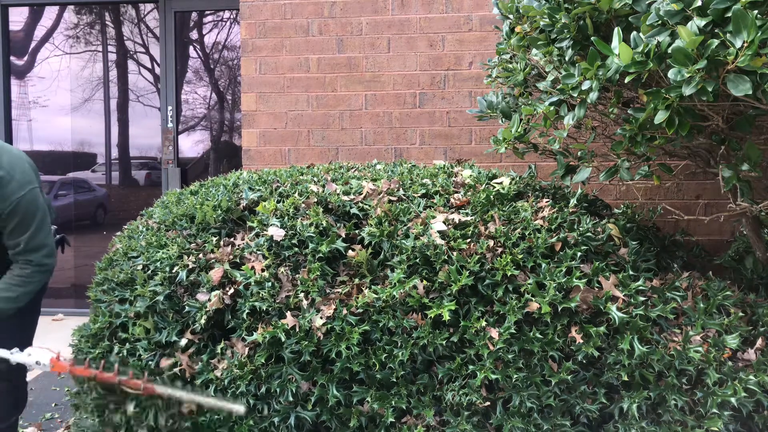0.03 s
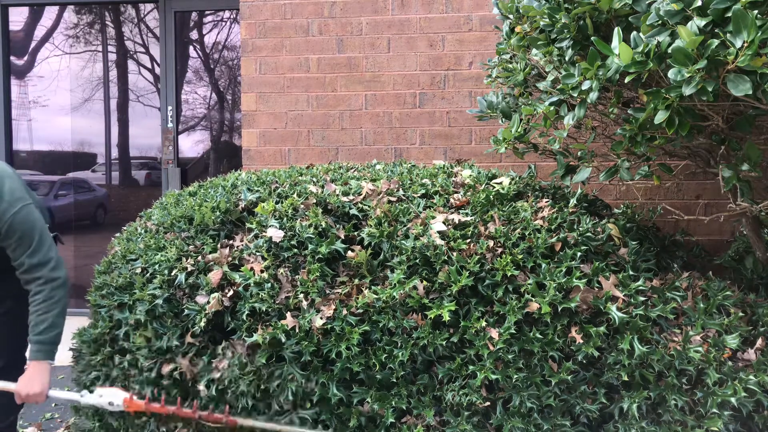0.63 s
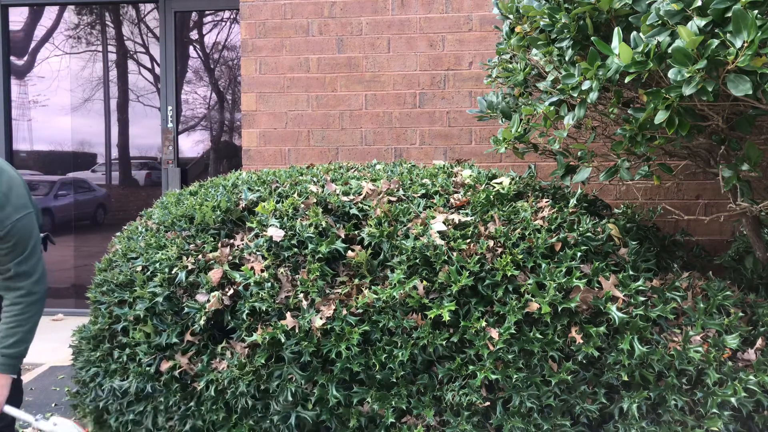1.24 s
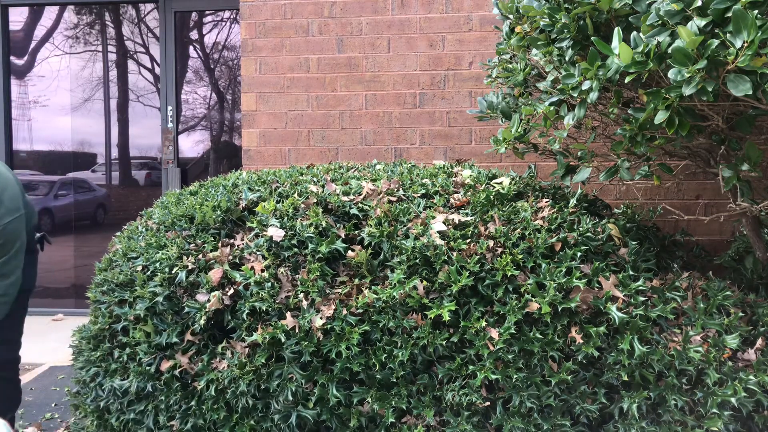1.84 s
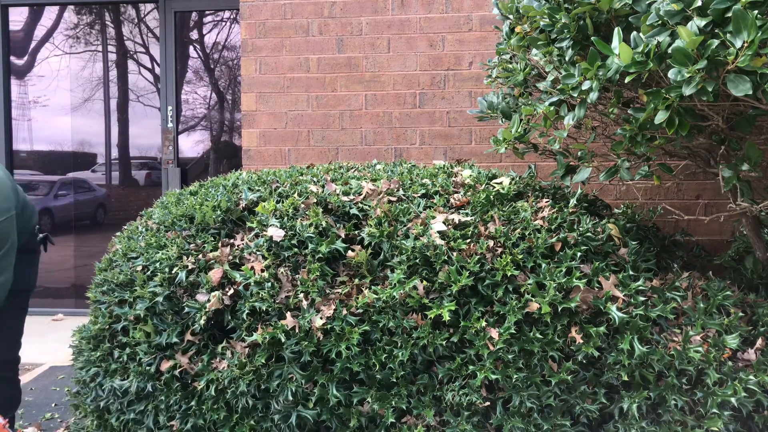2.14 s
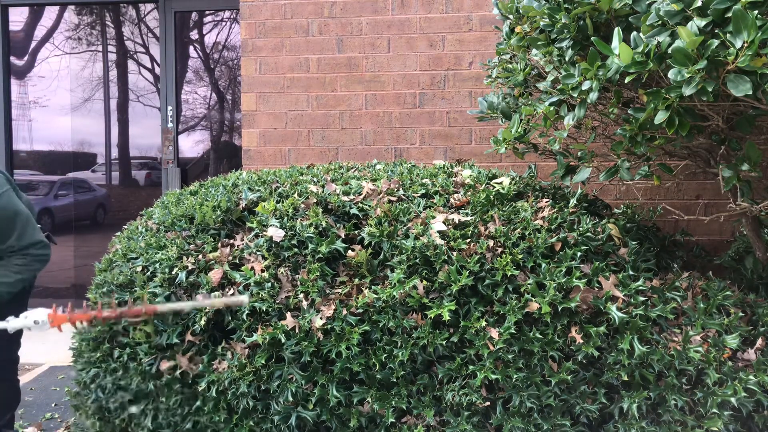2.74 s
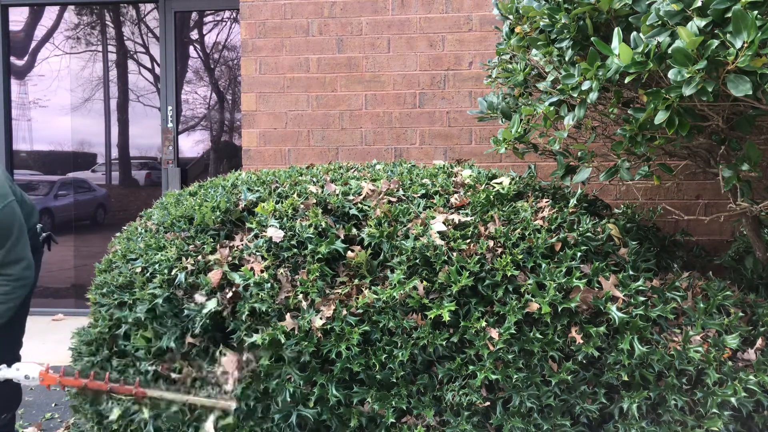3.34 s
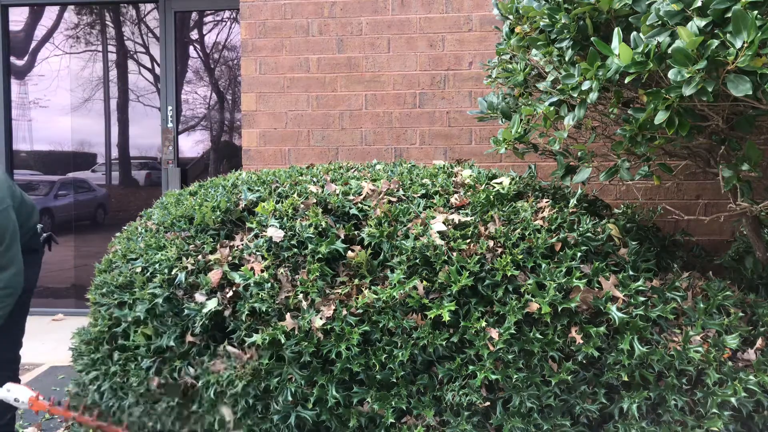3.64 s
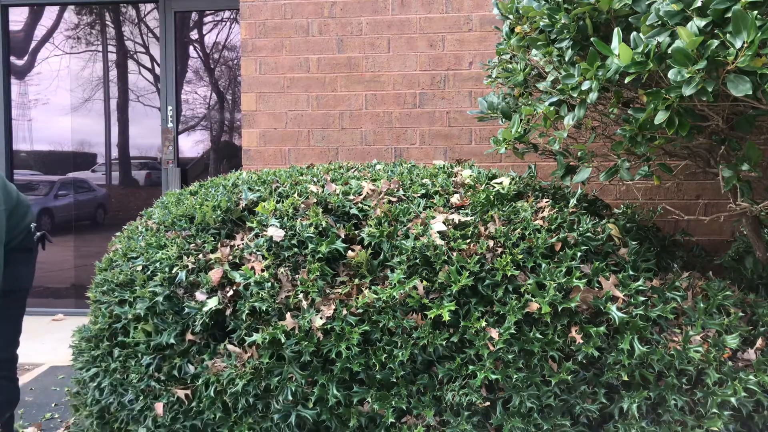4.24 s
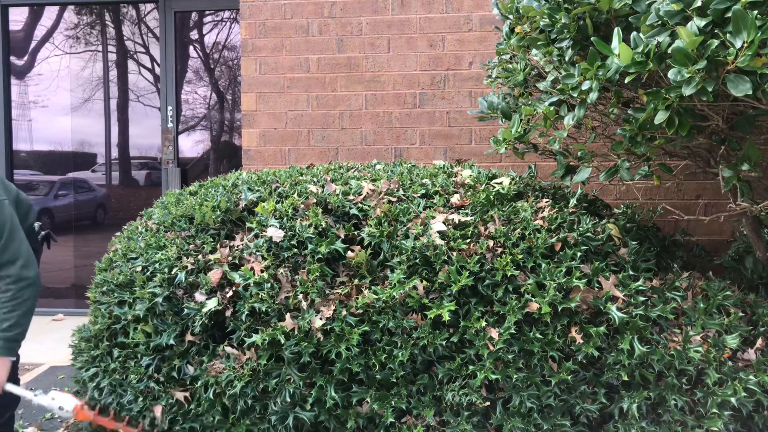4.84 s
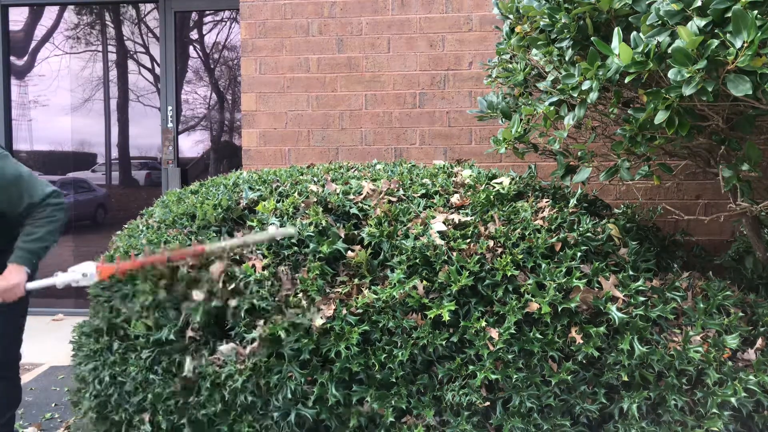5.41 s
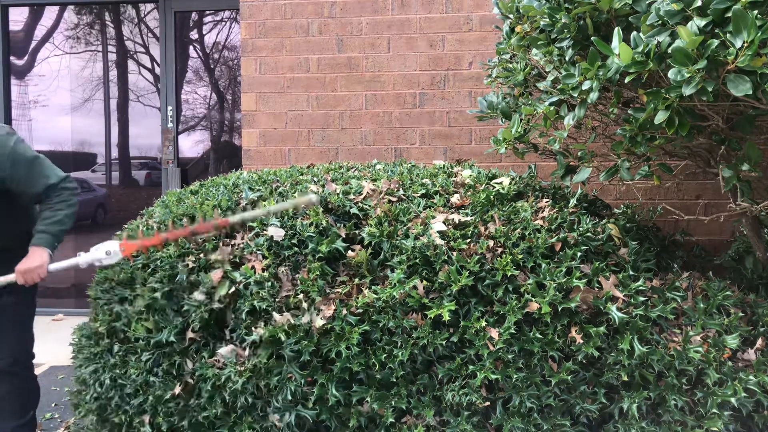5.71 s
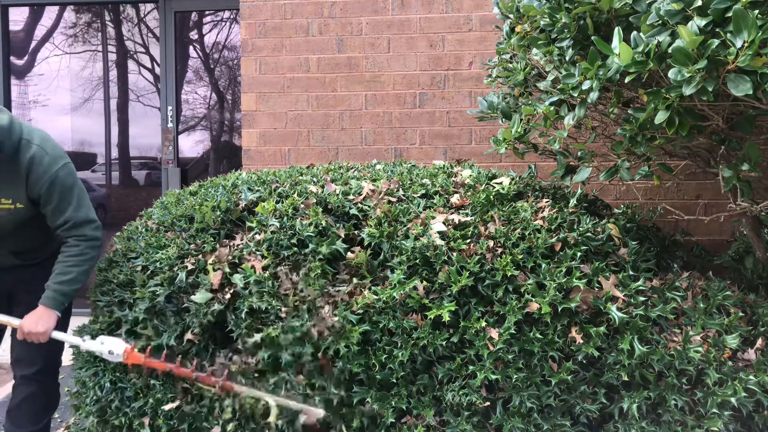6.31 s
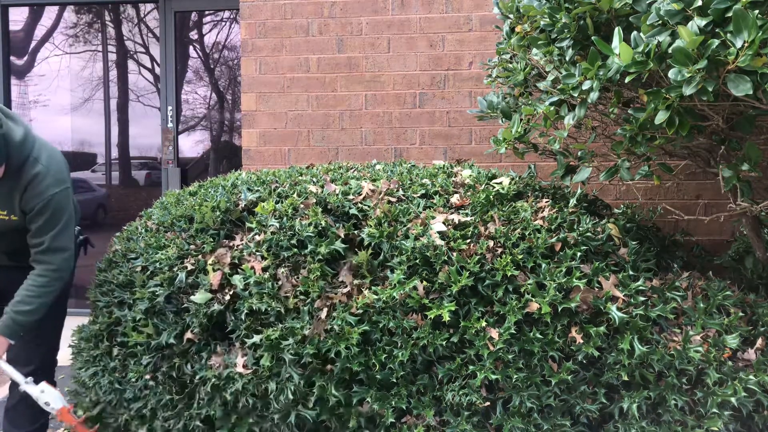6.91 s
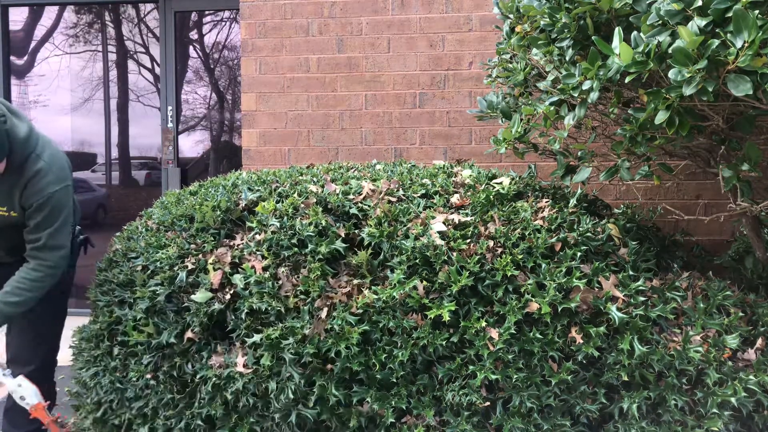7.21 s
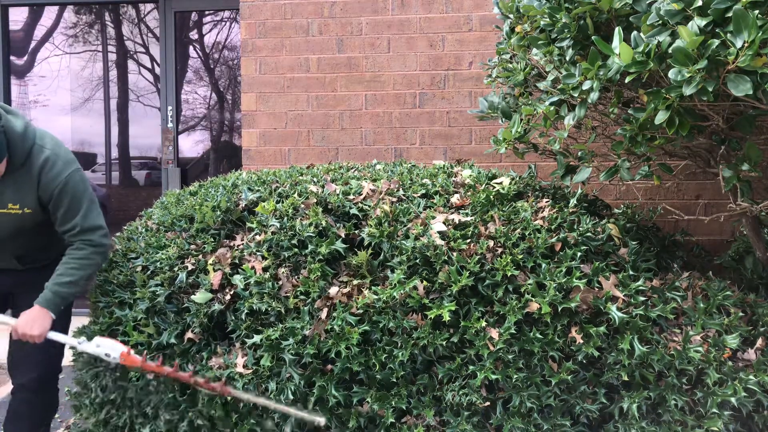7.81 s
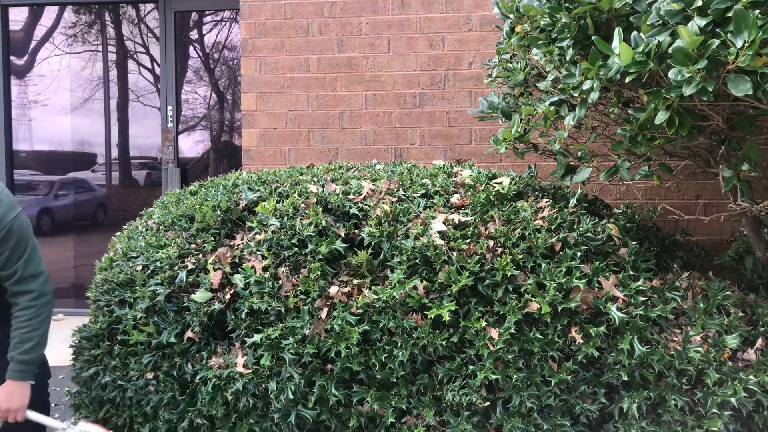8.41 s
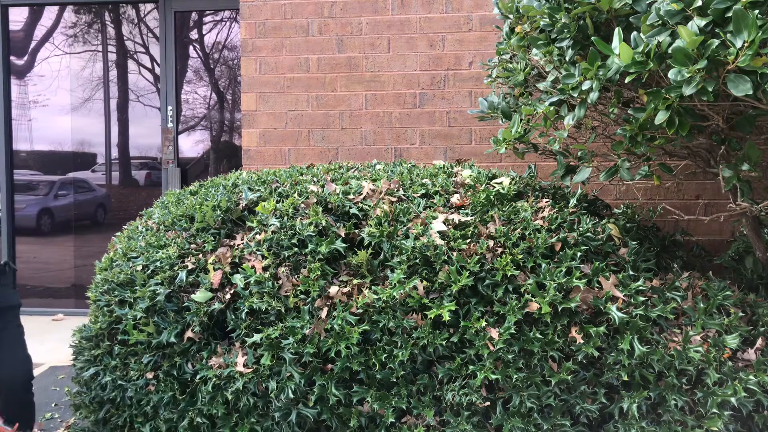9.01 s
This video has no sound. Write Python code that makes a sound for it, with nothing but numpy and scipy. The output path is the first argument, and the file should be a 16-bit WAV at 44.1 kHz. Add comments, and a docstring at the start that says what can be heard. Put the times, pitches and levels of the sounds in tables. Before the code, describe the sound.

Petrol hedge trimmer running flat out, the engine note swelling and fading over rattling blades and small snips of leaves and twigs.

```python
"""Steel blades clatter in leaves over the howl of a two-stroke pole hedge trimmer, flat out.
The blades knock at each end of their stroke, hiss as they slide, and snip leaves and twigs.
The rev limiter drops one spark in seven, so the exhaust stutters; its notes swell and fade as the
tool is swung before a brick wall, a few metres away. The throttle shuts at the very end."""
import sys
import numpy as np
from scipy import signal
from scipy.fft import rfft, irfft, next_fast_len
from scipy.io import wavfile
from scipy.ndimage import map_coordinates

SR = 44100
rng = np.random.default_rng(int(sys.argv[2]) if len(sys.argv) > 2 else 0)


def master(y):
    """Save y as 16-bit WAV."""
    cut = np.clip(np.atleast_2d(y).T, -1, 1)
    pcm = np.round(cut * 32767)  # scale
    wavfile.write(sys.argv[1], SR, pcm.astype(np.int16))


N = 403515
TIME_S = np.arange(N) / SR

# exhaust gas and cooling air spectrum: (frequency [Hz], gain [dB])
AIR_SPECTRUM = [(20, -33), (32, -18), (45, -4), (70, 0), (115, -3), (170, -8), (250, -2), (410, -31.5),
                (600, -1.5), (900, -3), (1300, -17.5), (2000, -13.5), (4000, -42)]
# muffler response to one firing: (frequency [Hz], gain [dB])
MUFFLER_RESPONSE = [(40, -15), (100, -1.5), (200, -11.5), (255, -29), (310, 2), (360, -1.5), (405, -3),
                    (510, 7.5), (555, -26), (655, 5), (860, -21.5), (1075, 2.5), (1170, -8), (1250, 0),
                    (1600, -11.5), (3000, -16)]
# cutter bar spectrum: (frequency [Hz], gain [dB])
BAR_SPECTRUM = [(800, -19), (1450, -6), (1900, -7), (2200, -3), (2700, -5), (3250, -1), (3950, -5),
                (4250, -4.5), (4900, -8.5), (5250, -5), (5700, -6.5), (6300, -5), (7100, -6.5),
                (7700, -13.5), (10000, -27.5)]
# longest-ringing bar modes: (frequency [Hz], relative level [dB])
BAR_MODES = [(2022, -7.5), (3079, -4.5), (3289, -3.5), (3480, -3), (5932, -16)]
# sliding edge spectrum: (frequency [Hz], gain [dB])
EDGE_SPECTRUM = [(5000, -34), (7700, -3.5), (8300, 0.5), (9200, -2), (9850, 0), (10450, -5), (11100, -0.5),
                 (12700, 2.5), (13500, -3.5), (14100, 2), (15000, -0.5), (15750, -6)]
# crank speed on the limiter: (time [s], speed [turns/s])
CRANK_SPEED = [(0.0, 156.9), (1.65, 157.2), (2.6, 156.7), (2.85, 157.3), (3.55, 156.7), (6.15, 157.5),
               (7.5, 156.5), (8.05, 158.0), (8.7, 156.7), (9.05, 158.1)]
# exhaust order 1: (time [s], level [dB])
ORDER_1 = [(0.0, -30), (0.8, -46.5), (1.748, -35.5), (2.95, -33), (8.15, -33.5), (9.05, -30)]
# exhaust order 3: (time [s], level [dB])
ORDER_3 = [(0.0, -31), (0.6, -39), (1.76, -29.5), (2.6, -37), (5.82, -31.5), (6.23, -34), (9.05, -30)]
# exhaust order 4: (time [s], level [dB])
ORDER_4 = [(0.0, -36), (1.15, -30.5), (2.0, -46), (2.55, -35), (5.15, -38.5), (5.8, -31), (6.75, -45),
           (7.0, -35), (8.15, -39), (8.3, -34), (9.05, -41.9)]
# exhaust order 5, lower howl note: (time [s], level [dB])
ORDER_5 = [(0.0, -53), (0.15, -32.5), (0.8, -32), (1.0, -39.7), (2.0, -28), (2.4, -36), (2.7, -26.5),
           (3.45, -28.5), (3.7, -37.5), (4.25, -24.5), (4.7, -38.5), (5.0, -30.5), (6.0, -36), (6.6, -27.5),
           (7.15, -34.5), (7.65, -26.5), (9.05, -31)]
# exhaust order 6, upper howl note: (time [s], level [dB])
ORDER_6 = [(0.0, -30), (0.5, -35), (1.0, -27), (2.55, -23.5), (2.9, -39), (4.0, -22.5), (4.2, -28.5),
           (4.5, -22.5), (4.85, -27.5), (6.05, -29), (6.2, -26.5), (6.8, -32), (7.0, -25.5), (7.3, -26),
           (7.6, -33), (8.1, -23.5), (9.05, -26.5)]
# orders swaying about one level: (order [x crank speed], level [dB], sway [dB], growl rise [dB])
STEADY_ORDERS = [(2, -27, 0.2, 3), (7, -38, 0.8, 7), (8, -36, 0, 3.5), (10, -43, -1, 4)]
# exhaust growls: (centre [s], half width [s], steady-order swell [0-1], stutter rise [dB])
GROWLS = [(1.7, .4, 0, 0.7), (4.25, .35, 0.3, 1.5), (7.202, 0.92, 1, 1.5)]
# passes through the hedge: (start [s], length [s], hiss rise [dB], stutter drop [dB])
CUTS = [(0.0, 0.49, 2, 4.5), (2.37, 1.12, 1, 5.5), (4.56, 0.76, 1.2, 5), (5.546, 0.57, 1.3, 4.5),
        (7.5, 1.1, 1.3, 1.5)]
# brief swells and dips of blade noise: (centre [s], half width [s], gain [dB])
RATTLES = [(.02, 0.049, 3.5), (.1, 0.027, -1.8), (2.24, 0.078, -0.3), (2.44, .06, 1), (4.42, .03, -1),
           (5.0, 0.17, 0.5), (6.88, 0.025, -2), (7.62, 0.037, 1), (8.55, 0.23, -1.5)]
# thick stems parting: (time [s], relative level [dB])
TWIG_CRACKS = [(3.7283, 4), (7.6, -8)]

BLADE_CYCLES_PER_TURN = 0.20915


def amp(db):
    return 10 ** (np.asarray(db) / 20)


def unit_rms(x):
    return x / np.sqrt(np.mean(x ** 2) + 1e-20)


def curve(rows):
    return np.interp(TIME_S, *np.transpose(rows))


def bump(centre_s, half_width_s):
    return np.exp(-((TIME_S - centre_s) / half_width_s) ** 2)


def wobble(rate_hz):
    """Smooth random curve, rms near 1."""
    knots = rng.standard_normal(int(N * rate_hz / SR) + 4)
    return map_coordinates(knots, [np.arange(N) * rate_hz / SR])


def crossings(cycles):
    """Samples where a cycle count passes an integer."""
    return np.flatnonzero(np.diff(np.floor(cycles)) > 0)


def decay(impulses, tau_s):
    return signal.lfilter([1], [1, -np.exp(-1 / (tau_s * SR))], impulses)


def minimum_phase(spectrum, n_fft):
    """Causal frequency response with the given (Hz, dB) gains."""
    hz, db = np.transpose(spectrum)
    gain = amp(np.interp(np.log(np.fft.rfftfreq(n_fft, 1 / SR) + 1), np.log(hz + 1), db))
    cepstrum = irfft(np.log(np.maximum(gain, 1e-6)))
    cepstrum[1:n_fft // 2] *= 2
    cepstrum[n_fft // 2 + 1:] = 0
    return np.exp(rfft(cepstrum))


def colour(x, spectrum):
    """Causal filter, output at rms 1."""
    n_fft = 2 * next_fast_len(N // 2 + 8192)
    return unit_rms(irfft(rfft(x, n_fft) * minimum_phase(spectrum, n_fft))[:N])


def air(turns, level_db=-32, pulse_depth=0.65):
    """Gas rushes out once a turn, over the steady cooling fan."""
    gate = 1 + pulse_depth * np.cos(2 * np.pi * turns)
    return amp(level_db + 0.91 * wobble(3.6)) * colour(gate * rng.standard_normal(N), AIR_SPECTRUM)


def twigs(tau_s=0.004, gain_db=-15):
    """A thick stem parts with one woody crack."""
    impulses = np.zeros(N)
    for time_s, db in TWIG_CRACKS:
        impulses[round(time_s * SR)] = amp(db + gain_db)
    wood = colour(rng.standard_normal(N), [(600, -23), (1600, 2), (3500, -2), (5000, -13), (10000, -24)])
    return decay(impulses, tau_s) * wood


def snips(hiss_db, rate_hz=60, scatter_db=1.8, tau_s=0.0003, gain_db=-21):
    """Leaves and thin twigs snap, more often as the blades hiss in the hedge."""
    bite = unit_rms(amp(2 * (hiss_db - hiss_db.mean())))
    snaps = rng.random(N) < rate_hz * bite / SR
    sizes = amp(scatter_db * np.clip(rng.standard_normal(N), -2, 2))
    cracks = decay(snaps * sizes, tau_s) * rng.standard_normal(N)
    return amp(hiss_db + gain_db) * colour(cracks, [(500, -39), (2500, 35), (7000, -16), (15000, -9)])


def hedge_load(bite_s=0.098, clear_s=0.42):
    """Leaves raise the blade hiss and drag on the engine, easing the limiter's stutter."""
    cut_db, ease_db = np.zeros((2, N))
    for start_s, length_s, rise_db, drop_db in CUTS:
        age_s = TIME_S - start_s
        depth = np.clip(np.minimum(age_s / bite_s, 1 - (age_s - length_s) / clear_s), 0, 1)
        cut_db = np.maximum(cut_db, depth * rise_db)
        ease_db = np.maximum(ease_db, depth * drop_db)
    return cut_db, ease_db


def growls():
    """Rough spells of the exhaust: steady-order swell and stutter rise [dB]."""
    return sum(np.outer([swell, rise_db], bump(centre_s, half_width_s))
               for centre_s, half_width_s, swell, rise_db in GROWLS)


def crank(stutter_db, turns_per_drop=7, surge_hz=2.9):
    """Crank turns and limiter cycles: speed falls at each dropped spark, then climbs back."""
    speed_hz = curve(CRANK_SPEED)
    slip_turns = 0.55 * wobble(4)  # drops come early or late
    limiter = (np.cumsum(speed_hz) / SR + slip_turns) / turns_per_drop
    ramp = signal.sawtooth(2 * np.pi * (limiter - 1 / turns_per_drop), 1 - 1 / turns_per_drop)
    swing_hz = surge_hz * unit_rms(amp(stutter_db)) * ramp
    jitter_hz = 0.65 * wobble(45)  # unequal firings
    return np.cumsum(speed_hz + swing_hz + jitter_hz) / SR, limiter


def stutter(turns, limiter, stutter_db, scatter=0.11, rebound=0.078, gain_db=-2):
    """A dropped spark is a missing puff; the next firing, on a fresher charge, is stronger."""
    firings = crossings(turns)
    dropped = np.diff(np.floor(limiter[firings]), prepend=0)
    puffs = np.zeros(N)
    puffs[firings] = scatter * rng.standard_normal(len(firings)) - dropped + rebound * np.roll(dropped, 1)
    return amp(stutter_db + gain_db) * colour(puffs, MUFFLER_RESPONSE)


def exhaust(turns, limiter, stutter_db, swell, flutter_db=0.52, lead_turns=0.059,
            relight_cycles=0.21, sag_cycles=0.083, sag_depth=0.29):
    """Crank harmonics swell and fade as the tool is swung, and sag at each dropped spark."""
    roughness = unit_rms(amp(1.5 * stutter_db + 2 * wobble(20)))
    howl_db = 1.3 * roughness * np.cos(2 * np.pi * (limiter - 0.62))  # slow to rebuild after a drop
    orders = [(1, curve(ORDER_1)), (3, curve(ORDER_3)), (4, curve(ORDER_4)),
              (5, curve(ORDER_5) + howl_db), (6, curve(ORDER_6) + howl_db)]
    for order, db, sway_db, rise_db in STEADY_ORDERS:
        orders.append((round(order), db + sway_db * wobble(1.514) + rise_db * swell))
    # same muffler phase as the puffs, so a missing puff dents the note
    muffler_rad = np.angle(minimum_phase(MUFFLER_RESPONSE, SR))  # 1 Hz bins
    crank_hz = np.mean(curve(CRANK_SPEED))
    notes = np.zeros(N)
    for order, db in orders:
        reflection_turns = 0.023 * wobble(2)
        phase_rad = 2 * np.pi * order * (turns + lead_turns + reflection_turns)
        phase_rad += muffler_rad[round(order * crank_hz)]
        notes += amp(db + flutter_db * wobble(30)) * np.cos(phase_rad)
    to_relight = (relight_cycles - limiter) % 1 / sag_cycles
    pressure = np.clip(1 - sag_depth * roughness * to_relight * np.exp(1 - to_relight), 0, 1)
    return np.sqrt(2) * amp(0.15) * unit_rms(pressure) * notes


def knocks(turns, scatter_db=1.5, limp_db=2, jitter_s=0.001, tau_s=0.0041):
    """Force on the bar: the blades take up their play four times a cycle, strong and weak in turn."""
    hits = crossings(4 * BLADE_CYCLES_PER_TURN * turns)
    size_draw, time_draw = np.clip(rng.standard_normal((len(hits), 2)), -2, 2).T
    size_db = scatter_db * size_draw + limp_db * (-1) ** np.arange(len(hits))
    onsets = np.clip(hits + jitter_s * SR * time_draw, 0, N - 1).astype(int)
    power = decay(np.bincount(onsets, amp(size_db) ** 2, N), tau_s)
    return unit_rms(np.sqrt(np.abs(power)))


def shimmer(contacts, t60_s=0.075, ring_db=-8, block=8192):
    """Direct contact plus a short, randomly changing ring: a metallic shimmer on the scraping."""
    hop = block // 2
    envelope = amp(-60 * np.arange(hop) / SR / t60_s)
    ring = np.zeros(N + 3 * block)
    padded = np.pad(contacts, (0, block))
    for start in range(0, N, hop):
        tail = rng.standard_normal(hop) * envelope
        piece = padded[start:start + block] * signal.windows.cosine(block)
        response = signal.fftconvolve(piece, tail / np.linalg.norm(tail))
        ring[start:start + len(response)] += response
    return contacts + amp(ring_db) * ring[:N]


def chinks(turns, scatter_db=4, t60_s=0.05):
    """Each stroke end rings the bar's main modes at new strengths."""
    hits = crossings(2 * BLADE_CYCLES_PER_TURN * turns)
    age_s = np.arange(SR // 8) / SR
    blow_db = scatter_db * np.clip(rng.standard_normal(len(hits)), -2, 1.7)
    ring = np.zeros(N)
    for hz, db in BAR_MODES:
        sizes = amp(db + blow_db) * rng.uniform(-1.14, 1, len(hits))
        mode = np.sin(2 * np.pi * hz * age_s) * amp(-60 * age_s / t60_s)
        ring += signal.fftconvolve(np.bincount(hits, sizes, N), mode)[:N]
    return unit_rms(ring)


def scrape(force, spectrum, flicker_db, spike_db):
    """Steel on steel: a stream of tiny, unequal contacts."""
    flicker = amp(flicker_db * wobble(80))
    grit = rng.standard_normal(N) * amp(spike_db * wobble(6000))
    return colour(shimmer(force * flicker * grit), spectrum)


def blade_levels(cut_db, throttle_shut):
    """Clatter and hiss rise in a cut, hiss more; slack blades clatter more off throttle."""
    rattle_db = sum(db * bump(centre_s, half_width_s) for centre_s, half_width_s, db in RATTLES)
    clatter_db = -18.5 + 0.39 * cut_db + 1.7 * throttle_shut + rattle_db
    hiss_db = -21.5 + cut_db + 0.45 * wobble(12) + rattle_db
    return clatter_db, hiss_db


def blades(turns, clatter_db, hiss_db, pole_hz=25, slide_force=1.0):
    """The blades knock and slide; the shaking pole presses them together unevenly."""
    force = np.hypot(knocks(turns), slide_force)
    shudder = wobble(18) * np.sin(2 * np.pi * pole_hz * TIME_S)
    shake_db = unit_rms(np.tanh(shudder)) + 0.23 * wobble(110)
    force *= amp(shake_db)
    clatter = scrape(force, BAR_SPECTRUM, flicker_db=0.082, spike_db=2.2)
    hiss = scrape(force, EDGE_SPECTRUM, flicker_db=0.52, spike_db=0.5)
    clatter += amp(-13.5) * chinks(turns)
    return amp(clatter_db - 0.28) * clatter + amp(hiss_db + 0.9) * hiss


def scene(release_s=9.06, closing_s=0.044, shut_db=-4, stutter_db_per_s=0.25):
    """One crank drives exhaust and blades; two identical channels."""
    throttle_shut = np.clip((TIME_S - release_s) / closing_s, 0, 1)
    cut_db, ease_db = hedge_load()
    swell, growl_db = growls()
    stutter_db = -29.5 + stutter_db_per_s * TIME_S + growl_db - ease_db
    turns, limiter = crank(stutter_db)
    clatter_db, hiss_db = blade_levels(cut_db, throttle_shut)
    firing = exhaust(turns, limiter, stutter_db, swell) + stutter(turns, limiter, stutter_db)
    engine = amp(shut_db * throttle_shut) * firing + air(turns)
    mix = engine + blades(turns, clatter_db, hiss_db) + snips(hiss_db) + twigs()
    return np.tile(mix, (2, 1))


def record(dry, low_hz=36, top_hz=15750):
    """Bass roll-off and hard treble limit."""
    n_fft = next_fast_len(N + 8192)
    hz = np.fft.rfftfreq(n_fft, 1 / SR)
    gain = hz ** 4 / (hz ** 4 + low_hz ** 4) * (hz < top_hz)
    return irfft(rfft(dry, n_fft) * gain, n_fft)[:, :N]


dry = scene()
out = record(dry)
master(out)
```